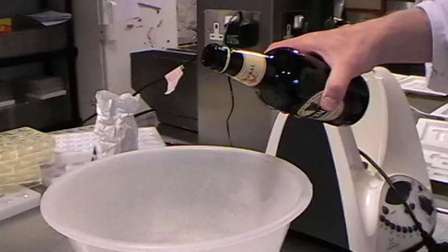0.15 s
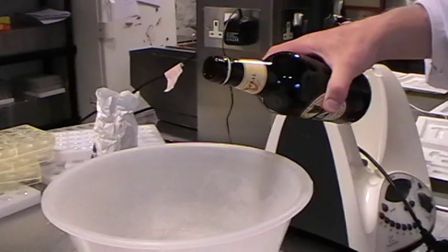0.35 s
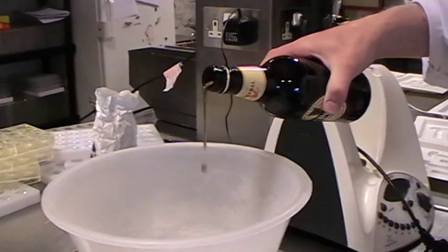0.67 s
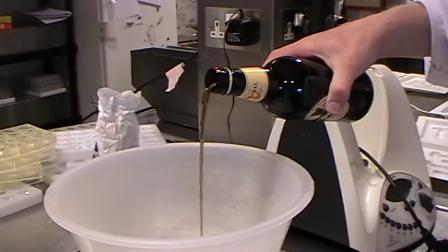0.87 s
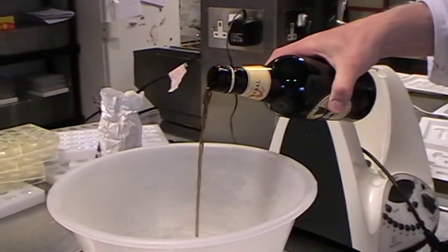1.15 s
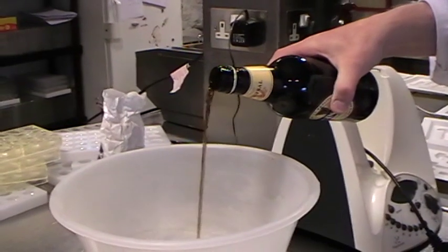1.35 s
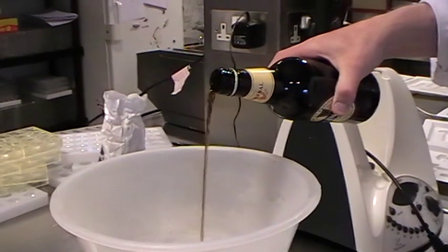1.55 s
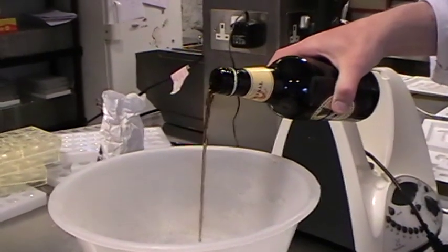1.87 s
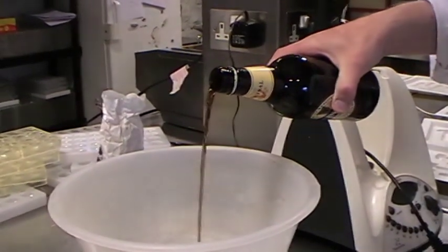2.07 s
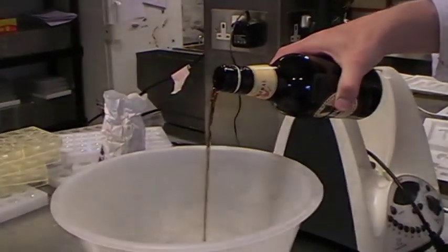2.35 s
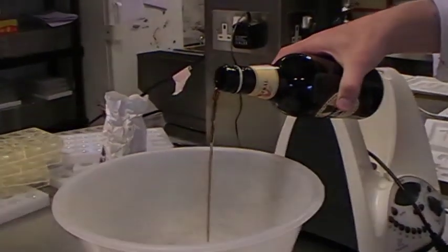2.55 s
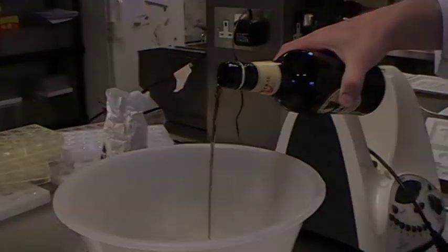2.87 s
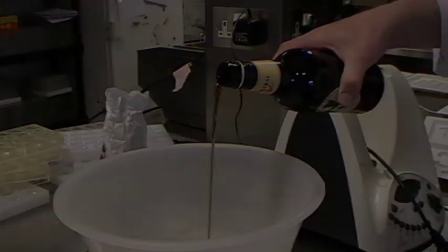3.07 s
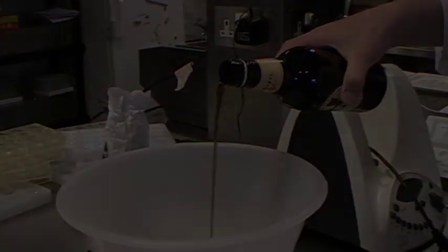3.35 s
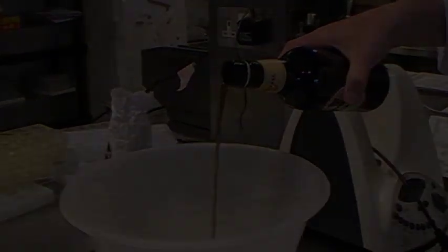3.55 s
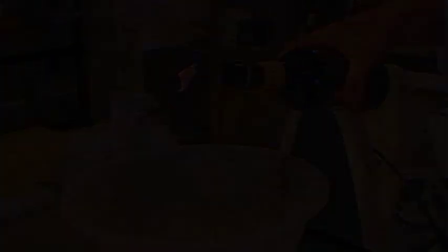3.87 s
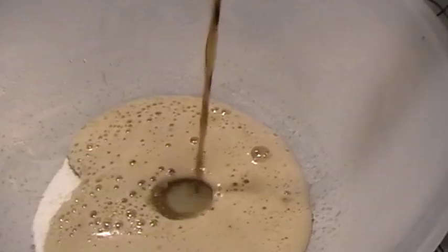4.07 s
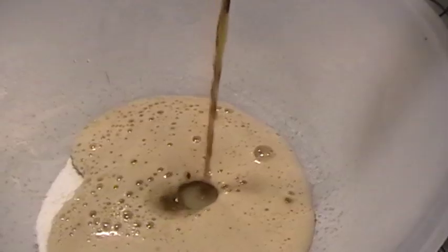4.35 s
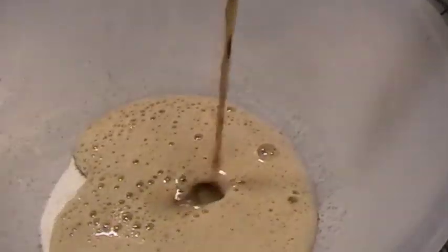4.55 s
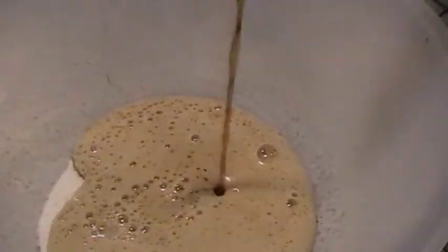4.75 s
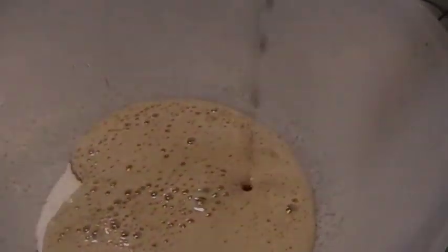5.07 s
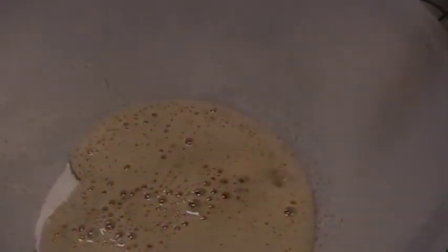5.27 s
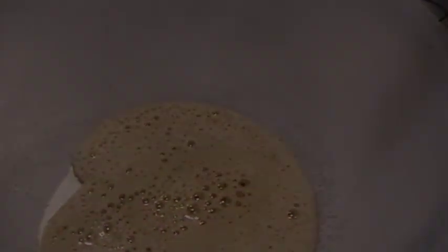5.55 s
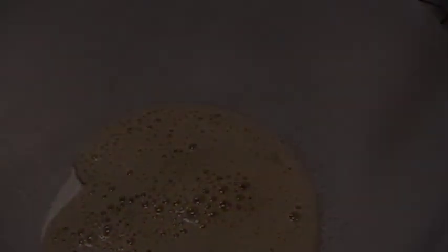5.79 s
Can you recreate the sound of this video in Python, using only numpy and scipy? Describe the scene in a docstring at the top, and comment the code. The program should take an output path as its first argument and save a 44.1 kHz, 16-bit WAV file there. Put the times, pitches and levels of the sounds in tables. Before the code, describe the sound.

Foamy beer trickles into a wide bowl in a humming kitchen; bubbles snap and fizz, fade out, then return closer with final drops.

```python
"""A kitchen: stout is poured in a thin stream into a wide plastic bowl, heard from a step away, then close up.
Random blows excite the bowl's modes as a drumming; dense shaped clicks make the foam fizz, sparse ones pop.
Bubbles snap as crack plus ring and droplets tick as short pulses, both scattered by the bowl's wall. Noise
makes the ventilation and sines its hum; further sines give thin steady high tones. Both passages start
abruptly; the steady layers fade, while snaps, drops, ticks and spray keep their own levels."""
import sys
import numpy as np
from scipy import signal
from scipy.fft import rfft, irfft
from scipy.io import wavfile

SR = 44100
rng = np.random.default_rng(int(sys.argv[2]) if len(sys.argv) > 2 else 0)


def digitize_waveform(pressure):
    """Quantize a signal to 16-bit integers and store it at the path in sys.argv[1].

    Rows of a 2-D input are taken as channels; values are limited to [-1, 1].
    """
    field = np.atleast_2d(pressure).T
    bounded = np.clip(field, -1, 1)
    quanta = np.round(bounded * 32767).astype(np.int16)
    wavfile.write(sys.argv[1], SR, quanta)


N = 261072
TIME = np.arange(N) / SR

# the loudest bursting bubbles: (t/s, peak level before reflections/dB, ring f/Hz, ring share against crack/0-1)
BURSTS = [(0.6726, -34, 1570, 0.2), (0.786, -32.5, 3050, 0.33), (1.07, -35, 2920, 0.15),
          (1.291, -33.5, 3060, 0.55), (1.4067, -23, 8000, 0.48), (1.4717, -10.5, 5800, 0.56),
          (1.706, -21.5, 6800, 0), (1.7159, -23, 2860, 0.07), (1.7405, -3, 3050, 0.64),
          (1.8237, -16, 3250, 0.37), (1.951, -9, 4800, 0.56), (2.002, -15.5, 3000, 0.51),
          (2.0132, -16, 5450, 0.57), (2.2044, -24, 5050, 0.1), (2.2452, -11, 5780, 0.59),
          (2.3038, -23, 7226, 0.53), (2.5093, -21.5, 6100, 0.22), (2.551, -27.5, 3050, 0.22),
          (2.578, -32.5, 5000, 0.55), (2.615, -31, 4800, 0.45), (2.6905, -34.5, 3420, 0.47),
          (2.7666, -26.5, 6900, 0.5), (2.9178, -34, 8200, .5), (2.9577, -34, 2870, 0.04),
          (2.982, -28, 4950, 0.47), (3.094, -38.5, 2920, 0.36), (3.305, -36.5, 7100, 0.67),
          (3.344, -36, 6300, 0.4), (3.6796, -33, 7000, 0.6), (4.0424, -20, 6700, 0.56),
          (4.129, -6.5, 4140, 0.41), (4.377, -24, 1750, 0.04), (4.397, -14.5, 7100, 0.47),
          (4.4403, -18, 2520, 0.37), (4.5474, -8, 7060, 0.37), (4.578, -14, 2680, 0.17),
          (4.6048, -4, 7060, 0.69), (4.6817, -16.5, 6700, 0.35), (4.7211, -19.5, 7300, 0.5),
          (4.887, -16, 6730, 0.45), (5.32, -39.5, 1770, 0.52), (5.3784, -40.5, 1520, 0.27)]
# modes of the wet bowl under the stream: (f/Hz, width/Hz, relative level/dB)
BOWL_MODES = [(183, 39, -6), (271.4, 18, 7.5), (432, 135, -3), (513, 66, -0.5), (623, 31, -4.5),
              (753, 65, -16), (1018, 49, -10.5), (1770, 230, -17.5)]
# resonances that colour a crack: (f/Hz, width/Hz, relative level/dB)
CRACK_MODES = [(1630, 370, -3), (3113, 2530, 2.5), (5500, 1700, 5.5), (7100, 3200, -0.5)]
# tone of the foam's hiss: (f/Hz, relative level per Hz/dB)
FIZZ_SPECTRUM = [(800, -31), (1700, -5), (2800, 1.5), (4700, 3), (7300, 0.5), (10000, -3), (13000, -12),
                 (16000, -45)]
# tone of the ventilation: (f/Hz, relative level per Hz/dB)
VENT_SPECTRUM = [(25, -30.5), (105, -15), (170, -5), (400, -4), (750, -14.5), (1050, -14.5), (2200, -23),
                 (4500, -29), (8500, -38), (16000, -45)]
# stereo width of the steady noises, side against mid: (f/Hz, level/dB)
SIDE_SPECTRUM = [(50, 0), (125, -4), (250, -12.5), (1000, -4.5), (4000, -6.5), (10000, -9)]
# mains hum: (f/Hz, rms level before the fader/dB)
HUM_LINES = [(200, -66.5), (590, -69)]
# thin steady high tones: (f/Hz, rms level/dB)
THIN_TONE_LINES = [(1500, -80), (3000, -85.5), (4500, -87), (6000, -85), (9000, -84.5), (10500, -89.5),
                   (12000, -81.5), (13500, -94.5)]
# drops that plop through the foam and knock the bowl: (t/s, relative plop level/dB, splash peak level/dB)
FALLING_DROPS = [(4.379, -26.5, -16), (4.549, -27.5, -40), (4.58, -25.5, -29), (4.826, -29.5, -31),
                 (4.853, -36, -30), (4.869, -27.5, -29), (4.9173, -25.5, -32), (4.933, -34, -23.5),
                 (4.951, -34, -48), (4.984, -33, -40), (4.999, -28, -21), (5.019, -27, -24),
                 (5.043, -29, -42), (5.062, -30.5, -33), (5.103, -30, -28.5), (5.1149, -27.5, -21),
                 (5.1438, -35, -23.5), (5.1654, -30.5, -26.5), (5.183, -38, -39)]
# the bowl's hollow lifts and cuts the treble by turns: (f/Hz, width/Hz, level against direct sound/dB)
HOLLOW_MODES = [(2870, 1200, -10), (3570, 1300, -4), (7060, 1200, -9)]
# flung droplets that tick on the foam and the wall: (t/s, peak level before reflections/dB)
FLUNG_DROPLETS = [(0.9975, -38), (1.1194, -40), (1.3513, -37), (1.3694, -36), (1.395, -30), (1.6255, -34.5),
                  (1.6788, -29.5), (1.8972, -28.5), (1.9174, -28), (2.0493, -22.5), (3.245, -41),
                  (4.061, -13), (4.0786, -19), (4.0961, -21), (4.1236, -22), (4.155, -19), (4.1713, -18),
                  (4.201, -27), (4.2163, -21), (4.2512, -18), (4.268, -22), (4.2995, -15.5), (4.351, -14.5),
                  (4.418, -17), (4.4585, -10), (4.491, -22), (4.5358, -21), (4.56, -21), (4.6494, -21.5),
                  (4.6995, -21.5), (4.727, -22), (4.752, -22.5), (4.804, -21.5), (4.983, -26)]
# puffs of fine bright spray over the foam: (t/s, starting level/dB)
SPRAY_PUFFS = [(0.846, -59.5), (0.997, -62.5), (1.168, -67), (1.35, -60.5), (1.406, -58), (1.704, -46),
               (1.823, -46.5), (1.951, -53.5), (2.012, -68), (2.508, -48.5)]

# the two passages and the fades, which the cuts end early: (start t/s, end t/s)
FAR, NEAR = (.199, 3.97), (4.038, 6)
FAR_FADE, NEAR_FADE = (1.96, 4.142), (4.644, 6.336)
FADER_DB, FADE_CURVE = 2.5, 1.765   # level before a fade; exponent of the ramp
# the pour: the stream lands, swells, runs steadily and dries up
LAND_S, SWELL_S, DRY_S, DRYING_S = 0.7, 0.12, 5.27, 0.19
# the head of foam grows and stays
HEAD_START_S, HEAD_GROWTH_S = 0.7, 1.2
# levels at full flow or full head, ahead of the fader; gains close up
DRUM_DB, DRUM_NEAR_DB = -55, 2.5
FIZZ_DB, FIZZ_NEAR_DB = -56.5, 4.5   # reference for hiss and pops
GURGLE_DB, SPATTER_DB = -63, -52.5
# each burst sets off the foam around it: extra fizz power per unit of peak amplitude; time constant
STIR_GAIN, STIR_S = 2.6, 0.059
PLOP_HZ, PLOP_SPREAD_OCTAVES = 510, 0.099   # typical pitch of the trapped air; scatter from drop to drop
CUTOFF_HZ = 16600


def from_db(db):
    """Decibels to gain."""
    return 10 ** (np.asarray(db) / 20)


def rms_one(x):
    """Scale to unit power."""
    return x / np.sqrt(np.mean(x ** 2) + 1e-20)


def coloured(x, spectrum):
    """Shape x with a spectrum of (f/Hz, level/dB) points."""
    hz, db = np.transpose(spectrum)
    bins = np.maximum(np.fft.rfftfreq(x.shape[-1], 1 / SR), 1)
    gain = from_db(np.interp(np.log(bins), np.log(hz), db))
    return irfft(rfft(x) * gain, x.shape[-1])


def band(x, low_hz, high_hz):
    """Gentle band-pass."""
    return signal.sosfilt(signal.butter(2, [low_hz, high_hz], "band", fs=SR, output="sos"), x)


def soften(x, top_hz):
    """Wet foam swallows the very top."""
    return signal.sosfilt(signal.butter(4, top_hz, fs=SR, output="sos"), x)


def resonate(x, modes):
    """Parallel resonances with alternating signs; a wider one dies away sooner."""
    out = 0
    for k, (hz, width, db) in enumerate(modes):
        r = np.exp(-np.pi * width / SR)
        poles = [1, -2 * r * np.cos(2 * np.pi * hz / SR), r * r]
        ringing = signal.lfilter([1, 0, -1], poles, x + 1e-18)
        out = out + (-1) ** k * from_db(db) * (1 - r * r) / 2 * ringing
    return out


def grains(per_s, spread_db):
    """Clicks at random moments; the spread makes many small and a few large."""
    sizes = from_db(spread_db * np.minimum(rng.exponential(1, N), 4)) * rng.choice([-1, 1], N)
    return sizes * (rng.random(N) < per_s / SR)


def tones(lines):
    """Steady sines at random phases."""
    return sum(np.sqrt(2) * from_db(db) * np.sin(2 * np.pi * (hz * TIME + rng.random())) for hz, db in lines)


def stereo(mid, side):
    """Left and right from mid and side."""
    return np.array([mid + side, mid - side])


def add(track, s, sound):
    """Mix a short sound into a track at time s."""
    start = int(s * SR)
    track[start:start + len(sound)] += sound[:N - start]


def ramp(start_s, length_s):
    """A straight rise from 0 to 1."""
    return np.clip((TIME - start_s) / length_s, 0, 1)


def by_passage(far, near):
    """One value from a step away, another close up."""
    return np.where(TIME < NEAR[0], far, near)


def fade_out():
    """In each passage the fader holds its level, then slides down until the passage is cut."""
    far, near = (1 - ramp(start, end - start) for start, end in (FAR_FADE, NEAR_FADE))
    return from_db(FADER_DB) * by_passage(far, near) ** FADE_CURVE


def background(level_db):
    """Ventilation is broad noise weighted by its spectrum, with a little mains hum."""
    mid, side = rms_one(coloured(rng.standard_normal((2, N)), VENT_SPECTRUM))
    return from_db(level_db) * stereo(mid, coloured(side, SIDE_SPECTRUM)) + tones(HUM_LINES)


def thin_tones(fader):
    """Thin steady sines, which linger until the fader is almost shut."""
    return np.minimum(from_db(22.5) * fader, 1) * tones(THIN_TONE_LINES)


def far_clack(s, level_db, t60, low_hz, high_hz):
    """Something clicks across the kitchen and arrives as a swell of dying reflections."""
    echoes = np.array([grains(per_s=4600, spread_db=0.0) for _ in range(2)])
    mid, side = rms_one(band(band(echoes, low_hz, high_hz), 1500, 11000))
    decay = from_db(level_db - 60 * np.abs(TIME - s) / t60)
    return stereo(mid, from_db(-13) * side) * decay * np.sqrt(ramp(s, 0.0078))


def snaps(cycles, glide, lag_s, near_ring, far_top_hz, near_top_hz, tear_db, tear_t60,
          far_wall_db, near_wall_db, wall_t60, side_db):
    """A bursting film gives a sharp crack, its cavity rings for a few cycles, and the wall scatters both."""
    mid, side, t = np.zeros(N), np.zeros(N), TIME[:SR // 20]
    for s, peak_db, hz, share in BURSTS:
        near = s > FAR[1]
        # the film gives way at once, then tears on as quickly dying noise
        tear = (t == 0) + rng.standard_normal(len(t)) * from_db(tear_db - 60 * t / tear_t60)
        # no two films alike
        modes = [(centre * 2 ** (0.032 * rng.standard_normal()), width, db) for centre, width, db in CRACK_MODES]
        crack = band(resonate(tear, modes), 670, near_top_hz if near else far_top_hz)
        # the ring peaks at age 1, rising in pitch as the cavity opens
        age = t * hz / cycles
        swell = age * np.exp((1 - age ** 2) / 2)
        ring = swell * np.sin(2 * np.pi * hz * t * (1 + glide * (age / 2 - 1)))
        ring_share = share * (near_ring if near else 1)
        snap = ring_share * ring + (1 - ring_share) * crack / np.abs(crack).max()
        snap = from_db(peak_db) * snap / np.abs(snap).max()
        # every burst gets its own pattern of reflections
        walls = rng.standard_normal((2, len(t))) * from_db(-60 * t / wall_t60) * (t > lag_s)
        walls = from_db(near_wall_db if near else far_wall_db) * walls / np.linalg.norm(walls[0])
        add(mid, s + lag_s, snap + signal.fftconvolve(snap, walls[0])[:len(t)])
        add(side, s + lag_s, signal.fftconvolve(snap, walls[1]))
    # mainly the shortest waves differ between left and right
    return stereo(mid, from_db(side_db) * band(side, 10000, 15000))


def in_hollow(x):
    """The bowl's hollow adds its resonances to the direct sound."""
    return x + resonate(x, HOLLOW_MODES)


def kitchen(x, t60, delay_s, low_hz, high_hz, side_db):
    """The room answers with a dense, dying cloud of reflections, nearly alike in both ears."""
    t = TIME[:SR * 3 // 4]
    noise = rng.standard_normal((2, len(t))) * from_db(-60 * t / t60) * (t > delay_s)
    cloud = band(noise, low_hz, high_hz)
    # about unit gain within the band
    mid, side = cloud / np.sqrt(np.sum(cloud[0] ** 2) * SR / 2 / (high_hz - low_hz))
    return signal.fftconvolve(stereo(mid, from_db(side_db) * side), x, axes=1)[:, :N]


def stream(flow, near_low_hz):
    """Soft blows of the falling beer drum on the bowl; close up the higher modes stand out."""
    blows = resonate(grains(per_s=1500, spread_db=6.0), BOWL_MODES)
    near_blows = from_db(DRUM_NEAR_DB) * rms_one(band(blows, near_low_hz, 2400))
    return flow * from_db(DRUM_DB) * by_passage(rms_one(blows), near_blows)


def stirred():
    """The fizz flares after each burst and settles again."""
    flares = sum(from_db(db) * (TIME > s) * np.exp(-np.abs(TIME - s) / STIR_S) for s, db, *_ in BURSTS)
    return np.sqrt(1 + STIR_GAIN * flares)


def foam(fizz, pops_per_s, hiss_db, pop_db, cycles):
    """Countless tiny bubbles hiss across the foam; larger ones pop singly at assorted pitches."""
    mid, side = (rms_one(coloured(grains(per_s=5200, spread_db=2.5), FIZZ_SPECTRUM)) for _ in range(2))
    hiss = stereo(mid, coloured(side, SIDE_SPECTRUM))
    clicks = grains(pops_per_s, spread_db=5.0)
    pitches = np.geomspace(2200, 7800, num=12)
    dealt = rng.integers(len(pitches), size=N)   # which pitch each click rings at
    rings = 0
    for k, hz in enumerate(pitches):
        rings = rings + resonate(clicks * (dealt == k), [(hz, hz / cycles, 0)]) * np.sqrt(pitches[0] / hz)
    pops = band(rings + .5 * resonate(clicks, CRACK_MODES), 1100, 10000)
    return fizz * (from_db(hiss_db) * hiss + from_db(pop_db) * pops)


def gurgle(low_hz, high_hz, cycles, near_db):
    """The stream drags air under, and pockets of many sizes ring in the pooled beer."""
    pitches = np.geomspace(low_hz, high_hz, num=12)
    rings = sum(resonate(grains(per_s=15, spread_db=4.5), [(hz, hz / cycles, 0)]) for hz in pitches)
    return from_db(GURGLE_DB + by_passage(0, near_db)) * rms_one(rings)


def spray(t60, low_hz, high_hz):
    """Each puff is a bright mist of tiny clicks that dies away."""
    power = sum(from_db(db - 60 * np.abs(TIME - s) / t60) ** 2 * (TIME > s) for s, db in SPRAY_PUFFS)
    mid, side = (rms_one(band(grains(per_s=2000, spread_db=4.0), low_hz, high_hz)) for _ in range(2))
    return np.sqrt(power) * stereo(mid, from_db(-9.5) * side)


def ticks(low_hz, top_hz, spread_octaves, lag_s, far_wall_db, near_wall_db, wall_t60):
    """A droplet or a drop's splash is one sharp pulse of its own brightness, scattered by the wall."""
    out, t = np.zeros(N), TIME[:SR // 20]
    for s, *_, peak_db in [*FLUNG_DROPLETS, *FALLING_DROPS]:
        brightness_hz = top_hz * 2 ** (spread_octaves * (2 * rng.random() - 1))
        tick = soften(band(t == 0, low_hz, brightness_hz), top_hz=11800)
        tick = from_db(peak_db) * tick / np.abs(tick).max()
        wall = rng.standard_normal(len(t)) * from_db(-60 * t / wall_t60)
        wall = from_db(near_wall_db if s > FAR[1] else far_wall_db) * wall / np.linalg.norm(wall)
        add(out, s + lag_s, signal.fftconvolve(tick, wall + (t == 0)))
    return out


def spatter(per_s, low_hz, top_hz):
    """Close up, the finest droplets crackle without pause where the stream lands."""
    crackle = soften(band(grains(per_s, spread_db=2.5), low_hz, top_hz), top_hz=9800)
    return by_passage(0, from_db(SPATTER_DB)) * rms_one(crackle)


def drops(plop_db, knock_db, t60, rise_per_s):
    """Each drop traps an air pocket that rings with rising pitch, and knocks the bowl's upper modes."""
    plops, clicks, t = np.zeros(N), np.zeros(N), TIME[:SR // 10]
    for s, drop_db, _ in FALLING_DROPS:
        hz = PLOP_HZ * 2 ** (PLOP_SPREAD_OCTAVES * rng.standard_normal())
        add(plops, s, from_db(drop_db - 60 * t / t60) * np.sin(2 * np.pi * hz * t * (1 + rise_per_s * t)))
        add(clicks, s, from_db([drop_db]))
    knocks = resonate(clicks, BOWL_MODES[4:])
    return band(from_db(plop_db) * plops + from_db(knock_db) * knocks, 270, 2500)


def scene():
    """The beer sounds in the bowl, the bowl in the kitchen; close up the kitchen is weaker."""
    fader = fade_out()
    flow = ramp(LAND_S, SWELL_S) * (1 - ramp(DRY_S - DRYING_S, DRYING_S))
    head = ramp(HEAD_START_S, HEAD_GROWTH_S)
    fizz = head * stirred() * from_db(FIZZ_DB + by_passage(0, FIZZ_NEAR_DB))

    air = fader * background(level_db=by_passage(-53.0, -51.0)) + thin_tones(fader)
    clack = far_clack(s=0.2953, level_db=-41.5, t60=0.4, low_hz=2780, high_hz=8600)
    beer = snaps(cycles=1.45, glide=0.055, lag_s=.0008, near_ring=0.89, far_top_hz=7900, near_top_hz=11000,
                 tear_db=-10.0, tear_t60=0.0062, far_wall_db=-5.0, near_wall_db=-7.5, wall_t60=0.053, side_db=1.0)
    beer = beer + fader * stream(flow, near_low_hz=325)
    beer = beer + fader * foam(fizz, pops_per_s=9.5, hiss_db=-4.5, pop_db=35.0, cycles=2.4)
    beer = beer + fader * flow * gurgle(low_hz=549, high_hz=1213, cycles=10, near_db=1.5)
    beer = beer + spray(t60=0.23, low_hz=7300, high_hz=10500)
    beer = beer + ticks(low_hz=1800, top_hz=8600, spread_octaves=0.15, lag_s=0.0014,
                        far_wall_db=4.0, near_wall_db=-6, wall_t60=0.02)
    beer = beer + fader * flow * spatter(per_s=220, low_hz=1765, top_hz=8300)
    beer = beer + drops(plop_db=-7.5, knock_db=38.5, t60=0.061, rise_per_s=1.0)
    beer = in_hollow(beer)
    send = from_db(by_passage(-9.0, -14.5)) * beer
    room = kitchen(send, t60=0.43, delay_s=0.0068, low_hz=207, high_hz=11130, side_db=-14.0)
    return beer + room + clack + air


def record(dry):
    """Only the two passages sound; the top is cut."""
    running = sum((TIME > start) & (TIME < end) for start, end in (FAR, NEAR))
    return signal.sosfilt(signal.cheby2(14, 60, CUTOFF_HZ, fs=SR, output="sos"), dry * running)


dry = scene()
out = record(dry)
digitize_waveform(out)
```